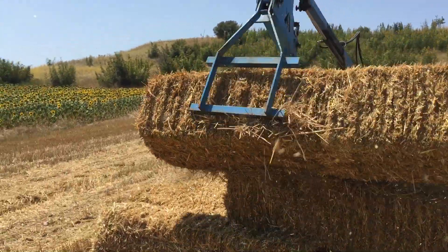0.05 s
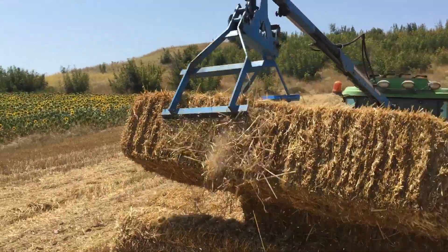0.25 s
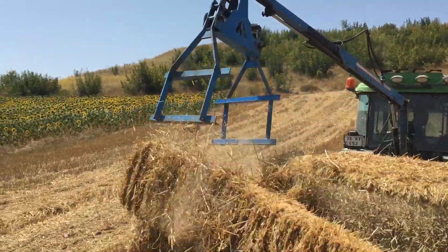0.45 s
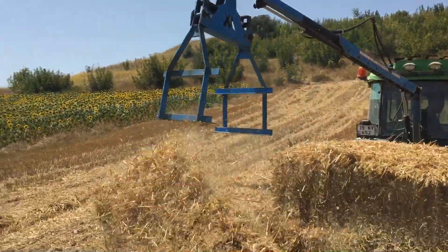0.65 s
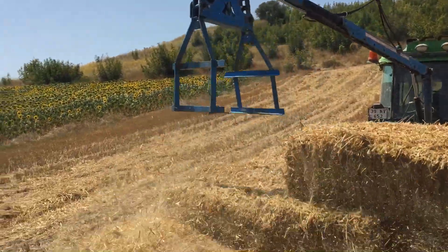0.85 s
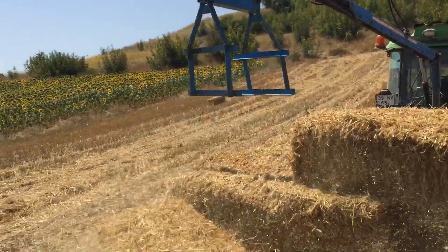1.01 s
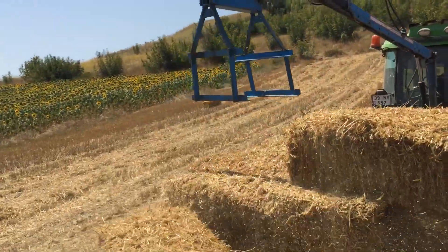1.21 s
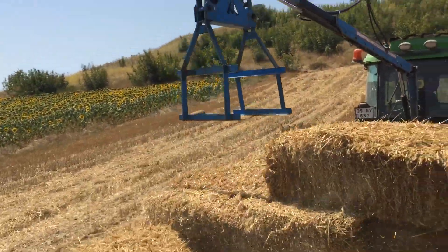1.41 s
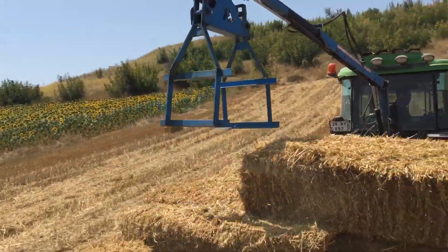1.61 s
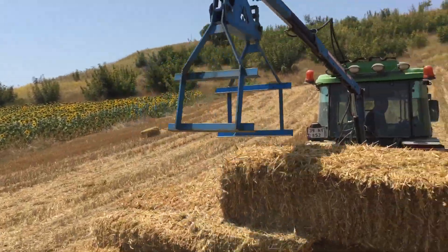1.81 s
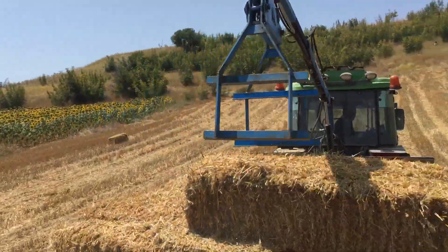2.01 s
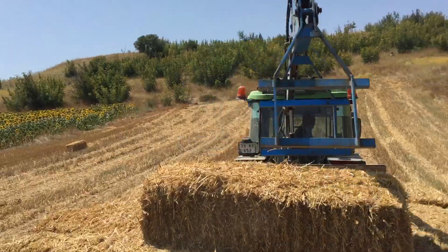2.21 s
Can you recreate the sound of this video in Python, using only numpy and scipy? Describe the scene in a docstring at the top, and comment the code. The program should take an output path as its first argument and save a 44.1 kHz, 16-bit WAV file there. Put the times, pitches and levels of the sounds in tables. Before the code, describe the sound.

A straw bale drops close by in a field. From 0.1 to 0.6 seconds a steel grapple creaks and clanks open while dry stalks crackle. At 0.7 seconds the bale lands with a deep, crunching thud, bumping softly again around 1 second. Chaff rustles down and the empty arms clink until about 1.8 seconds, when a faint hydraulic whine starts. A tractor's diesel rumbles throughout, with thin insect hiss behind.

```python
"""A straw bale drops from a tractor's steel grapple onto stubble, heard close by on one microphone.
The grapple's joints creak and clank open and stalks snap; the bale thuds, crunches, rebounds and settles.
Chaff rains down, and the empty arms clink on their pins as the boom swings and the hydraulic pump sings.
The four-cylinder diesel rumbles throughout; behind it, insects hiss thinly in the field."""
import sys
import numpy as np
from scipy import signal
from scipy.fft import rfft, irfft, next_fast_len
from scipy.io import wavfile
from scipy.ndimage import uniform_filter1d

SR = 44100
rng = np.random.default_rng(int(sys.argv[2]) if len(sys.argv) > 2 else 0)


def file_out(sig):
    """Save sig as 16-bit WAV at sys.argv[1]."""
    # one column per channel
    cols = np.atleast_2d(sig).T
    # limit, then scale
    lim = np.clip(cols, -1, 1)
    pcm = np.round(lim * 32767).astype(np.int16)
    wavfile.write(sys.argv[1], SR, pcm)


N = 103635
T = np.arange(N) / SR


def undb(db):
    return 10 ** (np.asarray(db) / 20)


def unit(x):
    return x / np.sqrt(np.mean(x ** 2) + 1e-20)


def curve(rows):
    return np.interp(T, *np.array(rows).T)


def colour(x, points):
    """Filter by (frequency [Hz], gain [dB]) points; rms 1."""
    hz, db = np.array(points, float).T
    n = next_fast_len(N)
    bin_hz = np.arange(n // 2 + 1) * SR / n + 1
    gain = undb(np.interp(np.log(bin_hz), np.log(hz), db))
    return unit(irfft(rfft(x, n) * gain, n)[:N])


def hump(hz, centre_hz, octaves):
    """Gain of a contact's colour: a hump on the octave scale."""
    return 1 / (1 + (np.log2(hz / centre_hz) / octaves) ** 2 / 4) ** 2


def tint(x, centre_hz, octaves):
    """Filter by that hump; rms 1."""
    n = next_fast_len(len(x))
    bin_hz = np.arange(n // 2 + 1) * SR / n + 1
    return unit(irfft(rfft(x, n) * hump(bin_hz, centre_hz, octaves), n)[:len(x)])


def walk(per_s):
    """Smooth random wandering; rms 1."""
    hold = int(SR / per_s)
    steps = np.repeat(rng.standard_normal(400), hold)[:N + hold]
    return unit(uniform_filter1d(uniform_filter1d(steps, hold), hold)[:N])


def swell(t, rise_s, t60_s):
    """Linear rise, then exponential decay."""
    return np.clip(t / rise_s, 0, 1) * undb(-60 * np.maximum(t - rise_s, 0) / t60_s)


def add(out, start_s, x):
    i = max(int(start_s * SR), 0)
    out[i:i + len(x)] += x[:N - i]


def stalks(per_s, scatter_db):
    """Snaps of many stalks: mostly tiny, a few large."""
    snaps = (rng.random(N) < per_s / SR) * rng.standard_normal(N)
    return snaps * undb(scatter_db * np.minimum(rng.exponential(size=N), 5))


def ring(modes, t, rise_s, centre_hz, octaves):
    """Steel modes weighted by the colour of the contact."""
    hz, db, t60 = np.array(modes, float).T[:, :, None]
    gain = undb(db) * hump(hz, centre_hz, octaves)
    waves = np.sin(2 * np.pi * (hz * t + rng.random(hz.shape))) * swell(t, rise_s, t60)
    return (gain * waves).sum(0) / np.sqrt((gain ** 2).sum() / 2)


def insects():
    """A high, slightly throbbing hiss from out in the field."""
    # spectrum of the chorus (frequency [Hz], gain [dB])
    chorus = [(6000, -31), (8000, -9), (9000, -0.5), (10400, -0.5), (11200, 7), (11900, -2), (12500, 10),
              (13300, -9), (16000, -31)]
    level_db, throb_db = -50, .7
    return undb(level_db + throb_db * walk(11.46)) * colour(rng.standard_normal(N), chorus)


def diesel():
    """Four unequal cylinders throb in the exhaust pipe over a low roar; the engine hisses, gears whine."""
    # firing rate (time [s], rate [Hz])
    firing_hz = [(0, 34.6), (.5, 35), (1.45, 37), (1.8, 36), (2.05, 33.6)]
    # cylinders in firing order (relative level [dB])
    cylinders_db = [0, -4, -11, -5]
    # spectra of the exhaust and of the mechanism's hiss (frequency [Hz], gain [dB])
    exhaust_colour = [(20, -32), (28, -3), (35, 12.5), (50, -3.5), (72, 6), (105, 3.5), (125, 3.5),
                      (140, 4.5), (165, -1.5), (200, -1), (260, -14.5), (400, -47), (700, -49)]
    hiss_colour = [(150, -4.5), (250, -2), (354, -7.5), (398, -1), (501, -14), (597, -3), (742, -8.5),
                   (786, -5.5), (1070, -10.5), (1360, -7), (1600, -11.5), (2370, -16.5), (8000, -48.5),
                   (10400, -59), (17600, -120)]
    # course of the roar and of the hiss (time [s], level [dB])
    roar_db = [(0, -36), (1.7, -33), (1.93, -52), (2.1, -34.5)]
    hiss_db = [(.6, -41), (1.6, -39), (1.95, -39.5)]
    # gear tones (frequency [Hz], level [dB])
    gears = [(1390, -51.5), (1518, -63)]
    strong_firing_s, jitter_cycles, pipe_hz = 0.0341, 0.015, 103
    cycles = np.cumsum(curve(firing_hz)) / SR
    cycles += jitter_cycles * walk(49) - np.interp(strong_firing_s, T, cycles)
    firing = np.floor(cycles).astype(int)
    size_db = np.array(cylinders_db)[firing % 4] + rng.standard_normal(128)[firing]
    puffs = colour(np.diff(firing, prepend=firing[0]) * undb(size_db), exhaust_colour)
    pipe = unit(signal.lfilter(*signal.iirpeak(pipe_hz, Q=5, fs=SR), puffs))
    exhaust = undb(-14) * puffs + pipe
    roar = colour(rng.standard_normal(N), exhaust_colour)
    hiss = colour(rng.standard_normal(N), hiss_colour)
    hiss *= (1 + 0.1 * np.cos(2 * np.pi * cycles)) * undb(walk(29.3))  # pulses with each firing
    whine = np.zeros(N)
    for hz, db in gears:
        tone = np.sin(2 * np.pi * hz * np.cumsum(1 + 0.00726 * walk(30.54)) / SR)
        whine += undb(db) * unit(tone * undb(2.5 * walk(9.6)))
    return undb(-34.5) * exhaust + undb(curve(roar_db)) * roar + undb(curve(hiss_db)) * hiss + whine


def pump():
    """The hydraulic pump sings as the boom swings, its pitch sagging a little under load."""
    # fundamental (time [s], frequency [Hz])
    pump_hz = [(1.75, 204.9), (2.35, 195.5)]
    # harmonics 2 to 4 (level [dB])
    harmonics_db = [-54, -53.5, -53.5]
    start_s, rise_s = pump_hz[0][0], .1
    cycles = np.cumsum(curve(pump_hz) * (1 + 0.0053 * walk(30.76))) / SR
    tones = sum(undb(db) * unit(np.sin(2 * np.pi * k * cycles) * undb(2 * walk(8.4)))
                for k, db in enumerate(harmonics_db, 2))
    return tones * np.clip((T - start_s) / rise_s, 0, 1)


def straw():
    """Loose straw rustles and rains down; the load and frame rub now and then."""
    # spectrum of the rustle (frequency [Hz], gain [dB])
    rustle_colour = [(600, 7), (2000, -4.5), (3800, 3), (4900, -5.5), (6100, 3.5), (7500, -1.5), (9000, 4),
                     (12500, -3), (16000, 3.5)]
    # course of the rustle (time [s], level [dB])
    rustle_db = [(0, -41), (.33, -31), (.55, -44), (.65, -31.5), (.89, -38.5), (.94, -32), (1.02, -37.5),
                 (1.3, -39.5), (1.55, -47), (2.35, -52)]
    # soft rubs (time [s], level [dB], rise [s], t60 [s], centre [Hz], width [octaves])
    rubs = [(0.04, -31, 0.055, 0.25, 188, 0.66), (0.486, -31.5, 0.027, 0.61, 60.4, 0.16),
            (0.913, -28, 0.025, 0.56, 109, 0.57), (1.0, -34.5, 0.027, 1, 185, 0.46),
            (1.743, -32.5, 0.0043, 0.38, 600, 0.97)]
    rustle = stalks(per_s=5000, scatter_db=1.5) + 0.39 * rng.standard_normal(N)
    out = colour(rustle, rustle_colour) * undb(curve(rustle_db))
    for start, db, rise_s, t60_s, centre_hz, octaves in rubs:
        rub = tint(stalks(per_s=2500, scatter_db=3), centre_hz, octaves)
        out += undb(db) * rub * swell(T - start, rise_s, t60_s)
    return out


def crackle():
    """Dry stalks snap one by one as the bale tears off the tines and tumbles."""
    # course of the snapping (time [s], level [dB])
    crackle_db = [(.07, -50.5), (.14, -40.5), (.46, -37), (.54, -44), (.66, -34.5), (.9, -62)]
    t, t60_s = T[:SR // 100], .004
    snap = rng.standard_normal(len(t)) * undb(-60 * t / t60_s)
    snaps = signal.fftconvolve(stalks(per_s=350, scatter_db=3), snap)[:N]
    return tint(snaps, centre_hz=3550, octaves=0.71) * undb(curve(crackle_db))


def pivots():
    """The empty arms swing and tap their pins: a tick and a light ring."""
    # taps (time [s], level [dB], centre [Hz], width [octaves], ring share [dB])
    clinks = [(0.833, -34.5, 5370, 0.33, -1.5), (1.089, -37, 3600, 0.24, -2),
              (1.257, -40.5, 3480, 0.28, -1), (1.731, -36.5, 4400, 0.11, -14),
              (1.828, -34, 4650, 0.65, -1.5)]
    # modes of the pivots (frequency [Hz], relative level [dB], t60 [s])
    modes = [(3340, -3, .22), (3510, -5, .28), (3800, -3, .15), (4188, -1, .1), (4480, -1, .15),
             (5190, -10, .36), (7400, -1, .09), (8100, -1, .08)]
    out, t = np.zeros(N), T[:SR // 2]
    for start, db, centre_hz, octaves, ring_db in clinks:
        tick = tint(rng.standard_normal(len(t)), centre_hz, octaves) * swell(t, 0.0013, t60_s=.06)
        ringing = ring(modes, t, 0.001, centre_hz, octaves)
        add(out, start, undb(db) * (undb(ring_db + 1) * ringing + undb(-1) * tick))
    return out


def short_modes(count):
    """The steel frame's answer to one slip: dense short modes, the higher dying faster."""
    # their spectrum (frequency [Hz], gain [dB])
    spectrum = [(400, -17), (850, 0), (1150, -5), (1500, -2.5), (2500, 1.5), (5000, -2.5), (6200, -2),
                (10400, -8.5), (16000, -6)]
    point_hz, point_db = np.array(spectrum, float).T
    t = T[:SR // 4]
    hz = 600 + 15000 * ((np.arange(count) + rng.random(count)) / count) ** 1.4
    t60_s = 0.16 * (hz / 3000) ** -0.3 * (1 + .25 * rng.uniform(-2.6, 1, count))
    db = np.interp(np.log(hz), np.log(point_hz), point_db) + 4 * rng.uniform(-2, 1, count)
    return sum(np.sin(2 * np.pi * (f * t + phase)) * undb(level - 60 * t / t60)
               for f, level, t60, phase in zip(hz, db, t60_s, rng.random(count)))


def grapple():
    """Joints slip and chatter; each knock rings the frame's long modes and a thicket of short ones."""
    # knocks (time [s], level [dB], chatter length [s], centre [Hz], width [octaves], ring share [dB])
    knocks = [(.111, -28, 0.016, 1810, 0.65, 2.5), (.124, -23.5, 0.036, 2150, 0.96, -11),
              (0.167, -23.5, 0.0019, 4600, 1.4, 0.5), (0.203, -22.5, 0.021, 3120, 1.24, -1),
              (.227, -21.5, 0.012, 4400, 1.8, -2), (.297, -24.5, 0.0059, 2340, 0.85, -3),
              (0.31, -17, 0.0038, 2450, 1.2, -12), (0.348, -26.5, 0.005, 2740, 1.1, 1),
              (0.378, -21.5, 0.0061, 1990, 1.4, -14), (0.388, -12, 0.0094, 3860, 0.98, -35),
              (0.4, -12, 0.02, 5970, 1.3, -7.5), (0.416, -20, 0.0037, 2400, 1.8, 11.5),
              (0.486, -23.5, 0.0078, 3140, 0.69, 2), (.567, -24.5, 0.004, 3800, 0.45, -15),
              (.586, -21, 0.0053, 6460, 0.49, 5.5), (0.627, -27, 0.018, 1640, 1.1, 1),
              (1.75, -34.5, .012, 2000, 1.4, -6), (1.779, -39.5, .02, 2500, 0.81, -0.5)]
    # long modes of the frame (frequency [Hz], relative level [dB], t60 [s])
    long_modes = [(1497, -6, 0.22), (1544, -6, 0.27), (2008, -9, 0.28), (2547, -1.5, 0.3), (2724, -6, 0.25),
                  (3418, -12, 0.42), (3716, -6, 0.2), (4160, -3, 0.17), (4527, -9, 0.28), (5645, -10, 0.17),
                  (6550, -7, 0.16), (8296, -10, 0.18), (8680, -4, 0.1), (9450, -8, 0.1), (11047, -4, 0.1)]
    slips_per_s = 410
    out, t = np.zeros(N), T[:SR // 2]
    response = short_modes(count=520)
    for start, db, chatter_s, centre_hz, octaves, ring_db in knocks:
        slips = rng.standard_normal(len(t)) * (rng.random(len(t)) < slips_per_s / SR) * (t < chatter_s)
        slips[0] = 1.65  # a firm first slip
        clatter = tint(signal.fftconvolve(slips, response)[:len(t)], centre_hz, octaves)
        clatter /= np.sqrt(uniform_filter1d(clatter ** 2, size=400).max())  # loudest 9 ms at rms 1
        ringing = ring(long_modes, t, chatter_s, centre_hz, octaves)
        add(out, start, undb(db) * (clatter + undb(ring_db - 7) * ringing))
    return out


def bale_ring(modes, pitch):
    """Damped modes of the landing bale, each starting after its own lag."""
    return sum(undb(db) * 2 ** .5 * np.sin(2 * np.pi * pitch * hz * (T - lag))
               * swell(T - lag, 0.0032, t60_s) for hz, db, t60_s, lag in modes)


def bale():
    """Stalks slap and crush first; the mass follows with a deep thump, rebounds, flops over and settles."""
    # landings (time [s], level [dB], thump [dB], knock [dB], thud [dB], crunch [dB], pitch [factor])
    landings = [(.667, 0, -.5, 1.5, 1, 0, 1), (.722, -20, 0, 0, 0, 0, 1),
                (.976, -12, -8, -.5, -1, -14, 1.22), (1.06, -22, -6, 0, 0, -12, 1.15),
                (1.13, -23, -6, -1, 0, -12, 1.2)]
    # modes of the deep thump and the body's knock (base frequency [Hz], level [dB], t60 [s], lag [s])
    thump_modes = [(57, -8, 0.19, 0.0171), (94.4, -5.5, 0.26, 0.01137)]
    knock_modes = [(158, -15, 0.13, 0.0032), (240.3, -16, 0.25, 0.00082), (290.5, -15, 0.17, 0.0023),
                   (408, -15, 0.025, 0.00187), (611, -32, 0.21, .01), (1330, -16.5, 0.017, 0.00202)]
    # spectra of the dull thud and the crushed stalks (frequency [Hz], gain [dB])
    thud_colour = [(40, -24), (130, -7), (350, 0), (480, -6), (650, -4), (950, -8), (1500, -11),
                   (3000, -28), (8000, -55)]
    crunch_colour = [(500, 0), (1400, -6), (2500, -4.5), (4200, -9.5), (7000, -16), (12000, -19.5),
                     (16000, -24)]
    thud_shape = undb(-13) * swell(T, 0.0081, t60_s=.15)
    crush = undb(-16) * swell(T, 0.0043, t60_s=0.39)
    slap = undb(-7.5) * swell(T, 0.00035, t60_s=0.013)
    out = np.zeros(N)
    for start, db, thump_db, knock_db, thud_db, crunch_db, pitch in landings:
        thump = undb(thump_db) * bale_ring(thump_modes, pitch)
        knock = undb(knock_db) * bale_ring(knock_modes, pitch)
        thud = undb(thud_db) * colour(rng.standard_normal(N), thud_colour) * thud_shape
        crunch = undb(crunch_db) * colour(stalks(per_s=4000, scatter_db=1), crunch_colour)
        add(out, start, undb(db) * (thump + knock + thud + crunch * (crush + slap)))
    return out


def scene():
    """All that reaches the spot beside the tractor, in mono."""
    return (grapple() + pivots() + bale() + straw() + crackle() + diesel() + pump() + insects())[None]


def record(dry):
    """The microphone sheds the deepest bass, rounds the loudest peaks and cuts the top."""
    low_cut_hz, drive, top_hz = 38, 0.57, 15850
    thinned = signal.sosfilt(signal.butter(4, low_cut_hz, "high", fs=SR, output="sos"), dry)
    rounded = np.tanh(drive * thinned) / drive
    return signal.sosfilt(signal.ellip(10, .2, 80, top_hz, fs=SR, output="sos"), rounded)


dry = scene()
out = record(dry)
file_out(out)
```